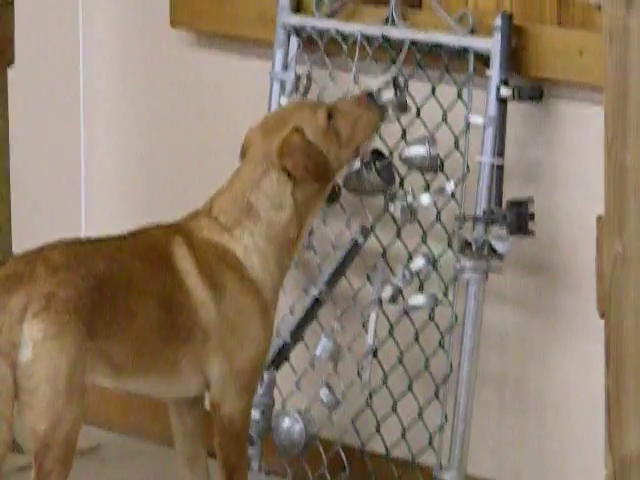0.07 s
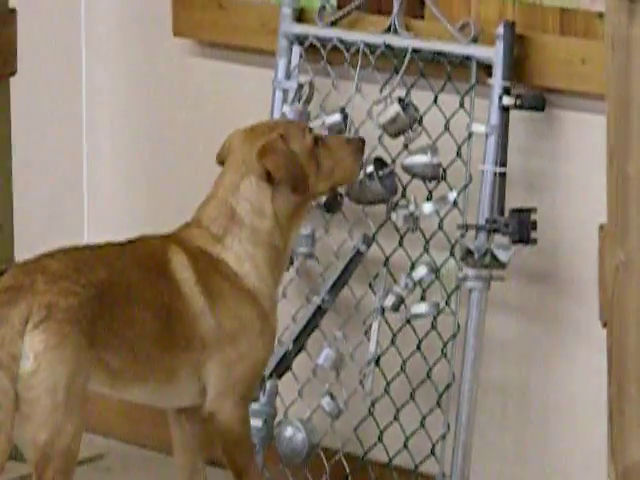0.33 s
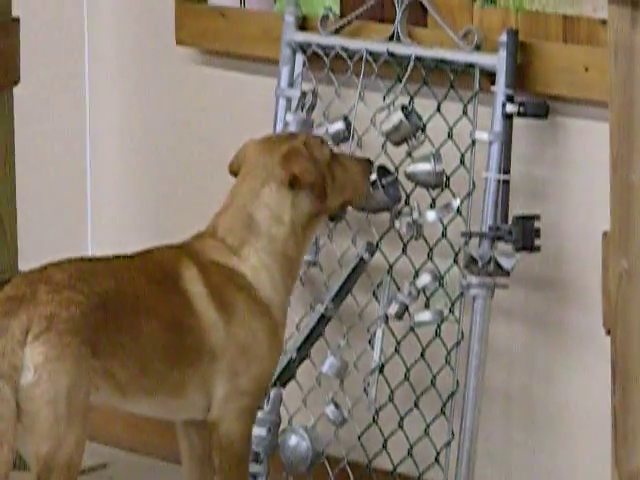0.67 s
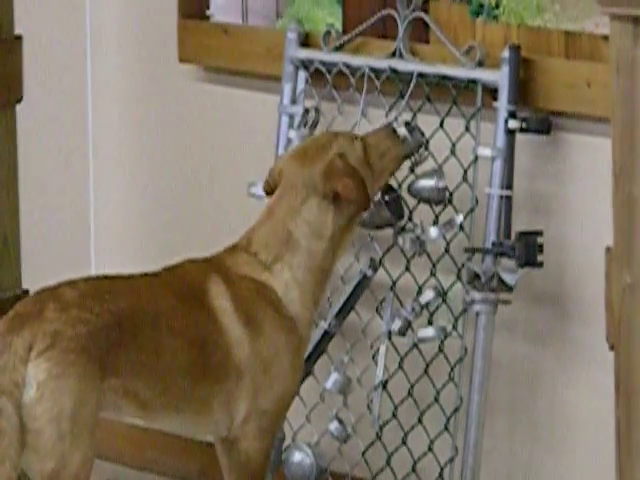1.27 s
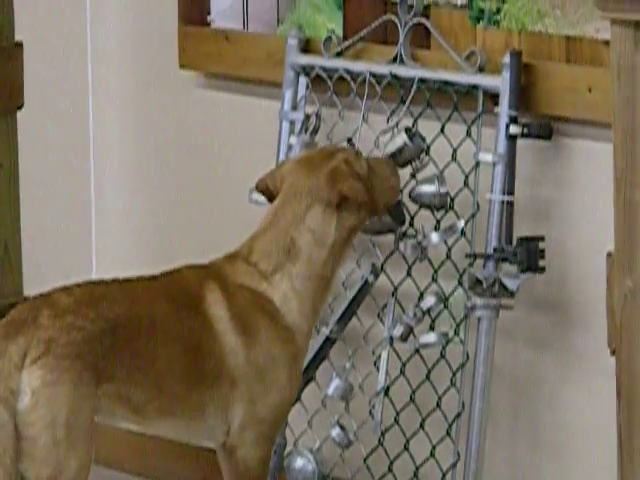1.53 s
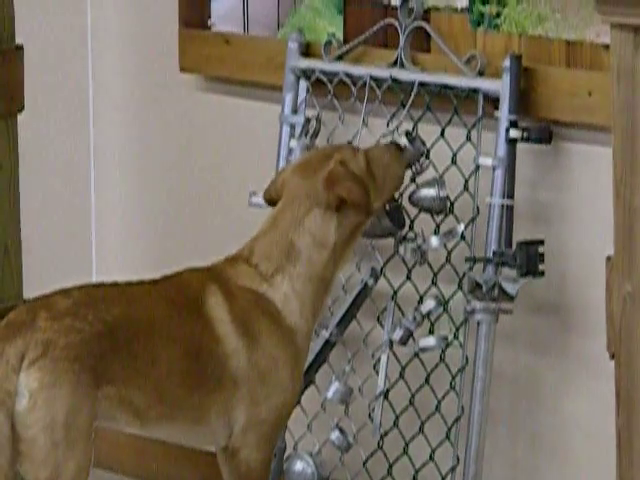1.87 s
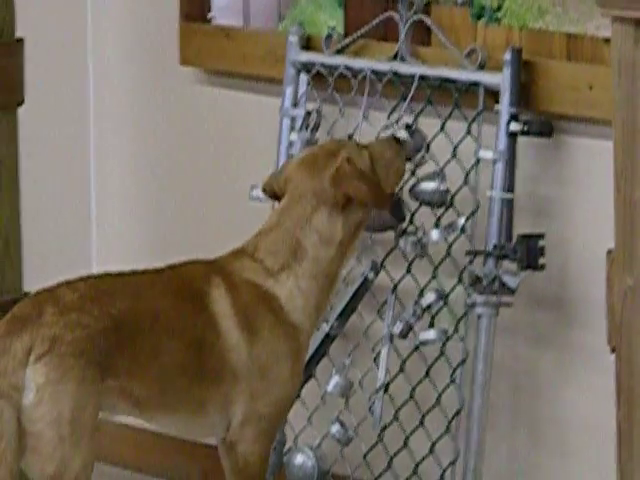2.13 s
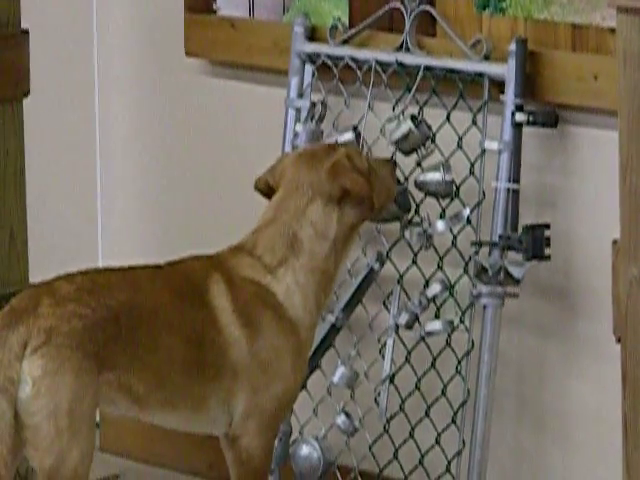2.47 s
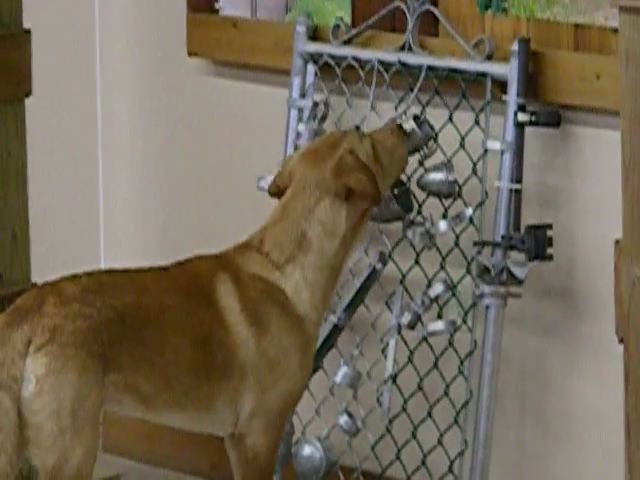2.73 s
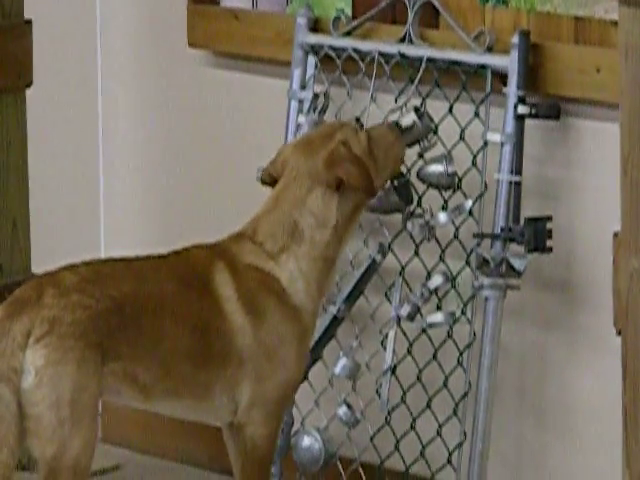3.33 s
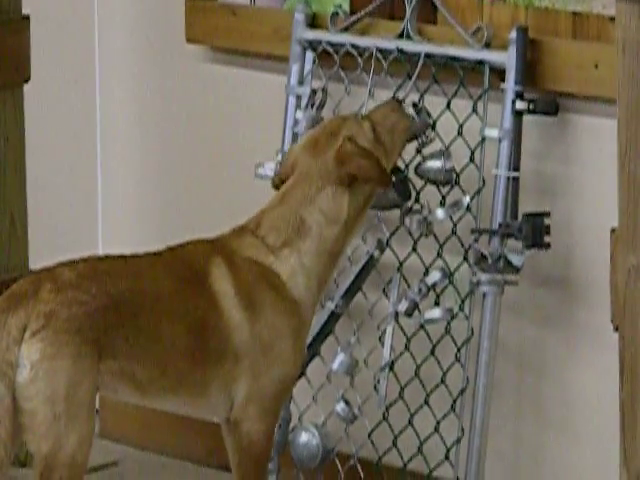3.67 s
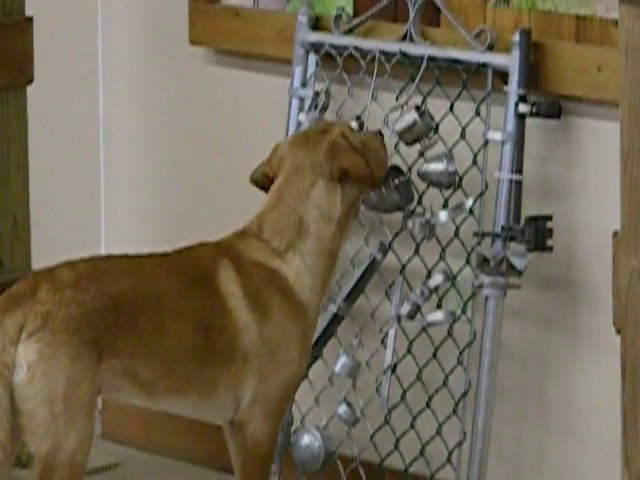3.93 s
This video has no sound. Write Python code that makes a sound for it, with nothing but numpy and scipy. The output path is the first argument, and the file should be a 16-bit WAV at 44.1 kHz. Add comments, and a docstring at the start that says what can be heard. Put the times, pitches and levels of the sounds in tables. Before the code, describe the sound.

Short metallic clinks and rattles from a dog nosing a wire gate in an echoing room.

```python
"""A sharp pop as a small camera starts, half a second of faintly ticking mute, a thump as its mic opens.
Then a dog noses metal cups and hardware hung on a chain-link gate: each knock rings the metal and
rattles the mesh, across an echoing room. A few sharp, dry clicks sound close by, and a fan blows and
hums underneath. The camera's narrow band dulls everything but the pop."""
import sys
import numpy as np
from scipy import signal
from scipy.fft import rfft, irfft
from scipy.io import wavfile
from scipy.ndimage import uniform_filter1d

SR = 44100
rng = np.random.default_rng(int(sys.argv[2]) if len(sys.argv) > 2 else 0)


def log_audio(samples):
    """Write samples as a 16-bit WAV file to the path given in sys.argv[1]."""
    # one column per channel
    frames = np.atleast_2d(samples).T
    # limit to full scale, then quantise
    limited = np.clip(frames, -1, 1)
    pcm = np.round(limited * 32767).astype(np.int16)
    wavfile.write(sys.argv[1], SR, pcm)


N = 176400

# The dog's nudges. Each row: start in seconds, level in dB, brightness in dB per octave, room send in dB.
GATE_KNOCKS = [(.515, -3.3, -2, 0), (.565, -9.5, -1.5, 2), (.712, -9, -8.5, -4), (.872, -4, 1, -11.5),
               (1.009, -8.5, 0.5, -10.5), (1.21, -10, -7.5, -4), (1.274, -8.5, -3, -9.5),
               (1.478, -8.5, -0.5, -8.5), (1.68, -11.5, 2, -2), (1.876, -7.5, -1, -5.5),
               (2.007, -9, -1.5, -11), (2.374, -3.5, -1.5, 2), (2.417, -5, 0.5, -2.5), (2.499, -9, -2, 0.5),
               (3.251, -2, -2.5, 0.5), (3.289, -5, -6, -0.5), (3.338, -4, 2, -6.5), (3.542, -6, -1.5, -15)]
# The ring of the hanging metal. Each row: pitch in Hz, relative level in dB, seconds to fade by 60 dB.
METAL_MODES = [(1245, -2, 0.16), (1373, 1, 0.1), (1533, -0.5, 0.09), (1760, -4.5, 0.041), (1960, -8, .14),
               (2108, -2.5, .12), (2500, -14.5, .08), (2690, -11, 0.14), (3240, -5, 0.13),
               (3400, -21, 0.048)]
# The tone of the mesh rattle. Each row: frequency in Hz, relative level in dB.
MESH_SPECTRUM = [(100, -22.5), (400, -13), (700, -8.5), (1000, 0), (1350, 4.5), (1850, -2), (2700, 3.5),
                 (3300, -3.5), (4000, -9.5)]
def gate_hardware(ring_db=-35.5, rattle_db=-22, rattle_t60=0.029, direct_db=-8, room_db=-0.44):
    """Each knock rings the hanging metal, rattles the wire mesh and spills into the room."""
    direct, send, t = np.zeros(N), np.zeros(N), np.arange(SR // 4) / SR
    fall = -np.log(1000) * t
    for start, db, bright_db, send_db in GATE_KNOCKS:
        chance = rng.random((len(METAL_MODES), 2))
        ring = sum((.5 + size) * amp(mode_db) * np.exp(fall / t60) * np.sin(2 * np.pi * (hz * t + phase))
                   for (hz, mode_db, t60), (size, phase) in zip(METAL_MODES, chance))
        rattle = shape_noise(rng.standard_normal(len(t)), MESH_SPECTRUM) * np.exp(fall / rattle_t60)
        knock = amp(db) * (amp(ring_db) * ring + amp(rattle_db) * rattle)
        knock = colour(knock, lambda f: amp(bright_db * np.log2(np.clip(f / 2000, .5, 2))))  # 1-4 kHz tilt
        add(direct, start, knock)
        add(send, start, amp(send_db) * knock)
    return amp(direct_db) * direct + amp(room_db) * room_tail(send)


# The close clicks. Each row: start in seconds, level in dB, brightness in dB per octave,
# rebound delay in seconds, rebound level in dB against the first hit.
CLICK_HITS = [(1.4115, -28, -12, 0.0023, 0), (1.4175, -9, -8.5, 0.00039, -11),
              (2.3711, -14.5, -14.5, 0.0009, -4.5), (2.9989, -10, 9.5, 0.00088, -25)]
# The ring of a click. Each row: pitch in Hz, relative level in dB, seconds to fade by 60 dB.
CLICK_RING = [(1560, -6, 0.002), (1910, -12, 0.0055), (2465, -4.5, 0.0059), (3140, -6, 0.0026),
              (3277, -7.5, 0.011), (3700, -14.5, 0.0024)]
def close_clicks(low_cut_hz=1400):
    """A hard contact and its instant rebound ring a small, heavily damped part."""
    out, t = np.zeros(N), np.arange(SR // 20) / SR
    fall = -np.log(1000) * t
    pivot_hz = CLICK_RING[2][0]
    for start, db, bright_db, rebound_s, rebound_db in CLICK_HITS:
        ring = np.zeros(len(t))
        for hz, mode_db, t60 in CLICK_RING:
            gain = amp(db + mode_db + bright_db * np.log2(hz / pivot_hz))
            ring += gain * np.exp(fall / t60) * np.sin(2 * np.pi * hz * t)
        add(out, start, ring)
        add(out, start + rebound_s, amp(rebound_db) * ring)
    return signal.sosfilt(signal.butter(6, low_cut_hz, "high", fs=SR, output="sos"), out)


# The room's decay. Each row: frequency in Hz, seconds to fade by 60 dB.
ROOM_DECAY = [(250, 0.57), (1300, .62), (2500, 0.68), (4000, 0.68)]
def room_tail(x):
    """Bare walls return a dense tail, the treble lingering a little longer."""
    hz, t, spectrum = signal.stft(rng.standard_normal(SR), SR, nperseg=256)
    decay = np.exp(-np.log(1000) * t / read(ROOM_DECAY, hz)[:, None])
    tail = signal.istft(spectrum * decay, SR, nperseg=256)[1]
    return signal.fftconvolve(x, tail / np.linalg.norm(tail))[:N]


# The tone of the rushing air. Each row: frequency in Hz, relative level in dB.
AIR_SPECTRUM = [(25, -23), (45, -16), (65, -5.5), (90, -8), (120, -1), (170, -2), (270, 2.5), (420, -1.5),
                (650, -0.2), (1000, -3), (1700, -8), (2400, -10.5), (3200, -12.5), (4000, -20), (4400, -25)]
# The fader ride on the air. Each row: time in seconds, level in dB.
AIR_FADER = [(.5, -40.5), (1.3, -40), (1.9, -41), (2.3, -41), (3.1, -40.5), (4, -41)]
# The fan's hum. Each row: pitch in Hz, level in dB, half-width in Hz.
HUM_LINES = [(118.2, -56, 3.8), (151.5, -60.5, 3.8), (248.5, -57.5, 7.7), (285.2, -47, 10), (358.6, -52, 7),
             (479, -64, 4), (597.2, -54.5, 7), (669, -63.5, 2.9), (795, -68, 3.8), (1068, -62.5, 6),
             (1364, -62.5, 26)]
def fan(flicker_db=0.77):
    """A softly flickering rush of air over narrow, wavering hum lines."""
    spectrum = signal.stft(rng.standard_normal(N), SR, nperseg=1024, noverlap=768)[2]
    flicker = uniform_filter1d(rng.standard_normal(spectrum.shape), size=10, axis=0)  # across frequency
    flicker = unit(uniform_filter1d(flicker, size=10, axis=1))  # across time
    air = signal.istft(spectrum * amp(flicker_db * flicker), SR, nperseg=1024, noverlap=768)[1][:N]
    air_db = np.interp(np.arange(N) / SR, *np.transpose(AIR_FADER))
    hum = sum(amp(db) * unit(colour(rng.standard_normal(N), lambda f: 1 / (1 + ((f - hz) / width) ** 2)))
              for hz, db, width in HUM_LINES)
    return amp(air_db) * shape_noise(air, AIR_SPECTRUM) + hum


# Spells of crackle in the mute. Each row: start in seconds, end in seconds, average ticks per second.
CRACKLE_SPELLS = [(0.034, .064, 350), (.072, .096, 1200), (0.103, 0.137, 400), (0.428, 0.518, 110)]
# Stray ticks between the spells. Each entry: time in seconds.
STRAY_TICKS = [.1645, .175, .183, .2295, .2655, .3075, .34, .341, .354, .36, .403]
def converter_crackle():
    """The muted converter ticks in one-sample spikes of either sign."""
    t = np.arange(N) / SR
    rate = sum(per_s * (t > start) * (t < end) for start, end, per_s in CRACKLE_SPELLS)
    ticks = (rng.random(N) < rate / SR) * rng.choice([-1, 1], N)
    for start in STRAY_TICKS:
        add(ticks, start, rng.choice([-1, 1], 1))
    return ticks


def mic_thump(start, rise_s=0.00045, recover_s=0.012):
    """The mic opens with a rounded voltage step, then the input swings slowly back."""
    step = lag(voltage_step(start, hold_s=0.0026, fall_s=.0018), rise_s)
    return step - lag(lag(lag(step, recover_s), recover_s), recover_s)


def voltage_step(start, hold_s, fall_s):
    """A negative jump that holds for a moment and relaxes."""
    t = np.arange(N) / SR - start
    return -np.clip(t * SR, 0, 1) * np.exp(-np.maximum(t - hold_s, 0) / fall_s)


def amp(db):
    """Decibels to gain."""
    return 10 ** (np.asarray(db) / 20)


def unit(x):
    """Scales to rms 1."""
    return x / np.sqrt(np.mean(x ** 2) + 1e-20)


def read(points, hz):
    """Reads a table on a log-frequency axis."""
    f, value = np.transpose(points)
    return np.interp(np.log(hz + 1), np.log(f + 1), value)


def add(mix, start, sound):
    """Drops a sound into the mix at a start time in seconds."""
    part = mix[max(round(start * SR), 0):][:len(sound)]
    part += sound[:len(part)]


def colour(x, gain):
    """Filters by a gain given as a function of frequency."""
    size = 2 * len(x)
    return irfft(rfft(x, size) * gain(np.fft.rfftfreq(size, 1 / SR)), size)[:len(x)]


def shape_noise(noise, spectrum):
    """EQs noise to a table, cuts it at 5 kHz and scales it to rms 1."""
    return unit(colour(noise, lambda f: amp(read(spectrum, f)) * (f < 5000)))


def lag(x, seconds):
    """One-pole smoothing."""
    pole = np.exp(-1 / (seconds * SR))
    return signal.lfilter([1 - pole], [1, -pole], x)


def scene():
    """A mono mix: the fan as a bed, the gate across the room, the clicks up close."""
    return (fan() + gate_hardware() + close_clicks())[None]


def record(dry):
    """The camera pops, ticks while muted, then opens with a thump onto a narrow band."""
    open_s, fade_in_s = .5195, 0.013
    band_hz, slope_hz, top_hz = 4064, 110, 16800
    fade_in = np.clip((np.arange(N) / SR - open_s) / fade_in_s, 0, 1)
    ticks = amp(-44.5) * converter_crackle() * SR / (2 * band_hz)  # makes up the peak lost to the band
    sound = dry[0] * fade_in + amp(-11.5) * mic_thump(open_s) + ticks
    sound = colour(sound, lambda f: .5 - .5 * np.tanh((f - band_hz) / (2 * slope_hz)))
    pop = amp(-2.5) * voltage_step(.0363, hold_s=.00054, fall_s=.00005)
    high_cut = signal.firwin(511, top_hz, window=("kaiser", 9), fs=SR)
    return signal.oaconvolve(sound + pop, high_cut, "same")[None]


dry = scene()
out = record(dry)
log_audio(out)
```